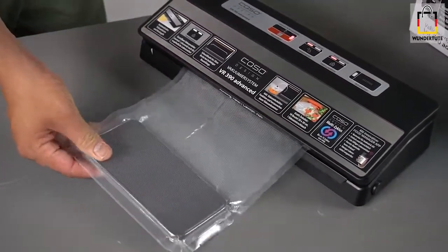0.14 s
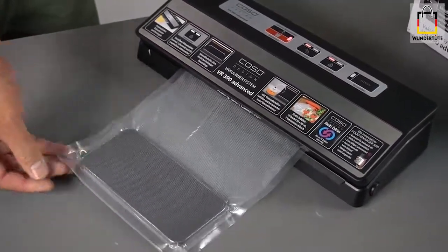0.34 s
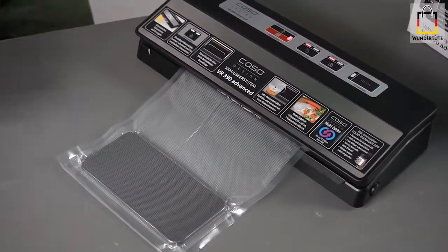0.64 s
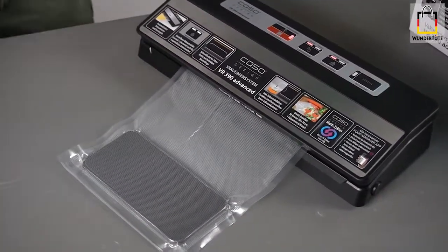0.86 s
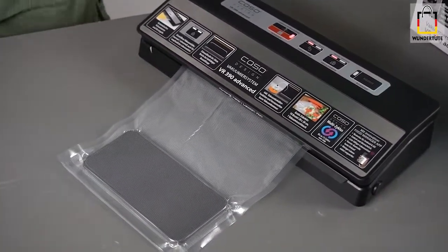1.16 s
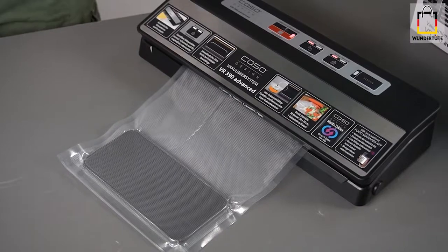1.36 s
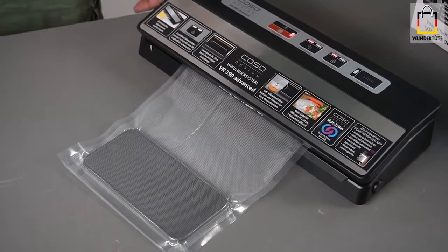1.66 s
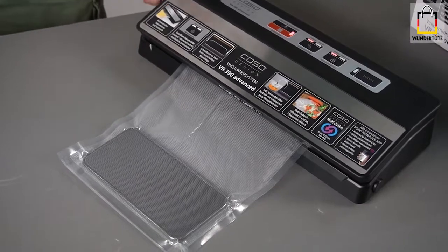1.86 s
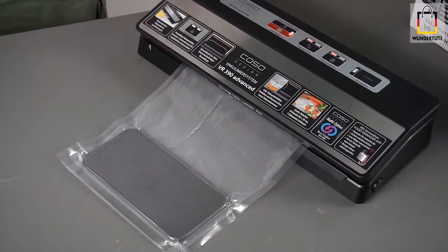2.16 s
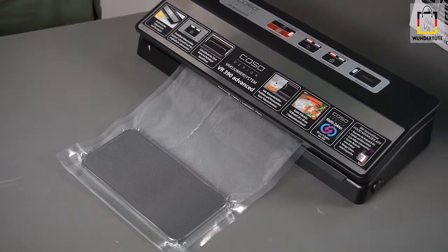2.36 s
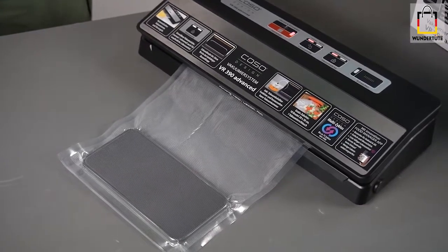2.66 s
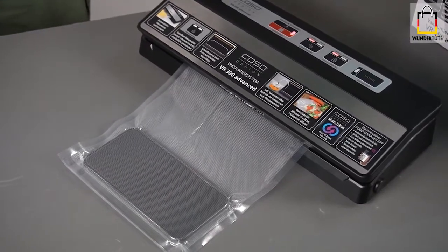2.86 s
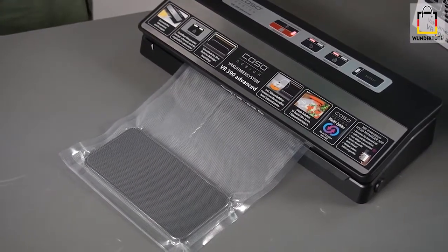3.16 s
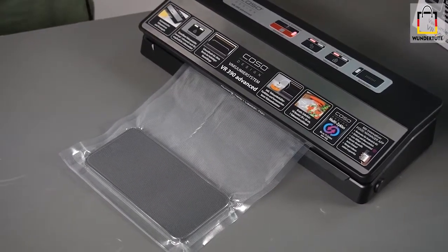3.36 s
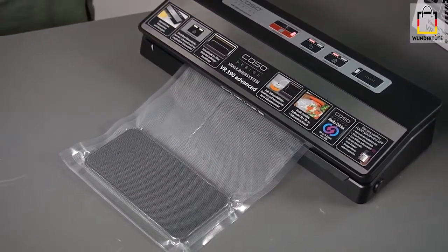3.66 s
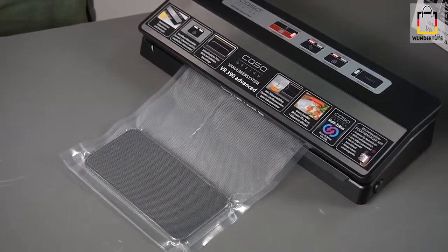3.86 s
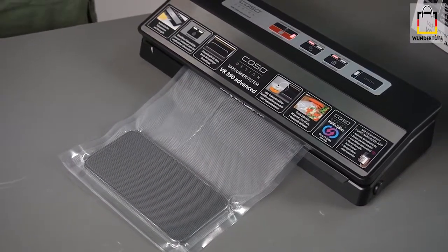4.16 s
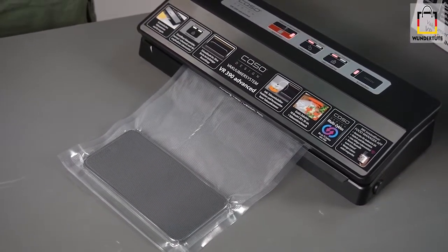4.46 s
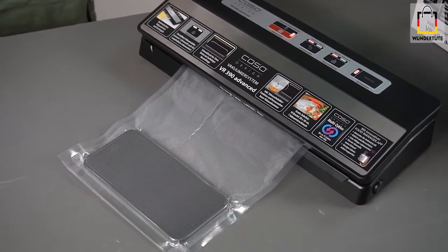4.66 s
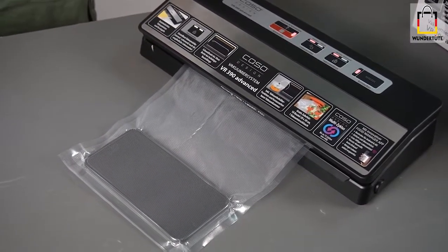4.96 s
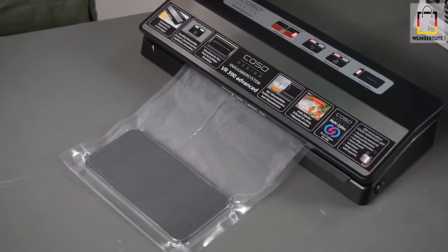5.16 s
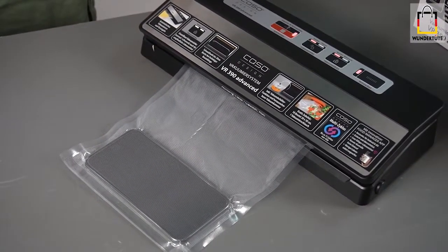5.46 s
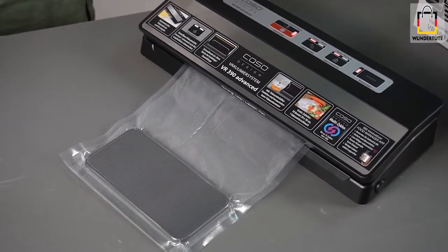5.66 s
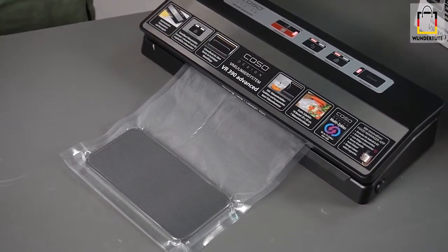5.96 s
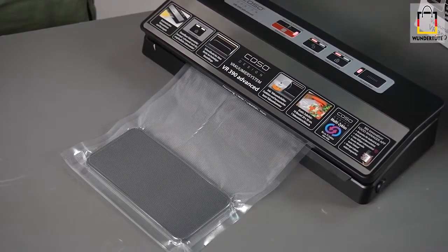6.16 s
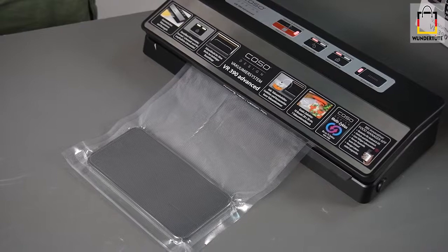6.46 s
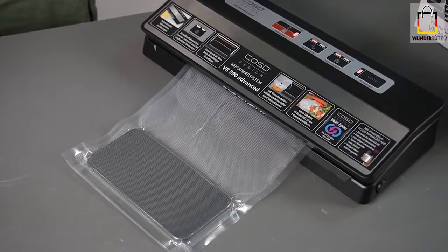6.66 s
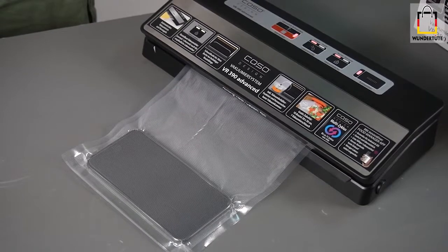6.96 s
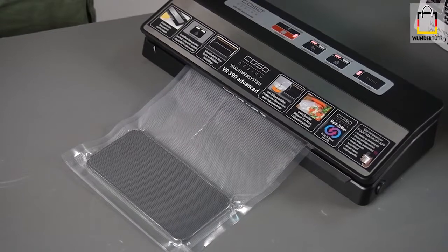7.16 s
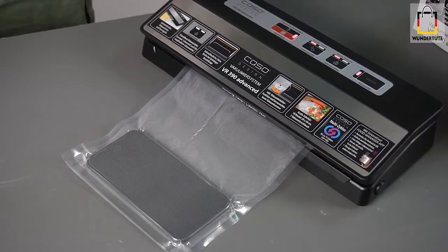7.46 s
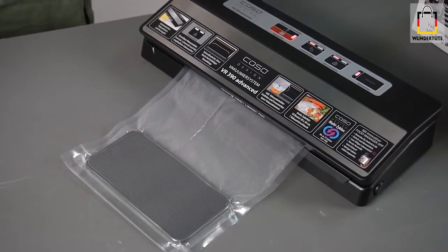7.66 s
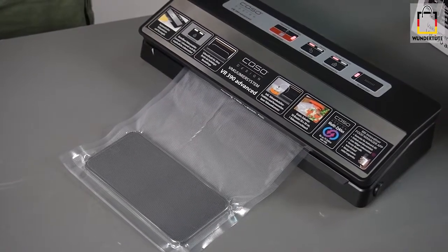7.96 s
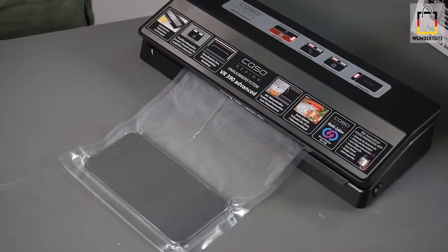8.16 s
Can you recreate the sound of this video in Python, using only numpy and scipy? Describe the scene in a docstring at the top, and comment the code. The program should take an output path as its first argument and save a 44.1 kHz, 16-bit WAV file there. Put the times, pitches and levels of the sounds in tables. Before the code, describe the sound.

A small vacuum sealer is already running on a table, heard close up. Its pump knocks so rapidly in the plastic housing that it forms a buzzing drone, with a fine valve rattle, a whirr of air and a faint electrical hum. From about 0.2 to 0.6 seconds, a flat object in a plastic bag settles on the table with a cluster of soft thuds. The film crinkles in short, light bursts up to about 1.4 seconds, and once more faintly near 2.7 seconds. Over the first two seconds the motor rises slightly in pitch, whining overtones swell and fade, and the airy hiss eases as the bag empties. The drone then holds steady. At about 4.4 seconds sealing begins: the motor drops a little in pitch and changes tone, then runs on evenly until the end at about 8.3 seconds.

```python
"""A small vacuum sealer on a table draws the air from a plastic bag. From the start, each stroke of its
piston pump knocks the plastic housing and rattles the valves, over a whirr of air and a faint hum.
In the first second a hand lets the bag and its flat load settle on the table with soft thuds.
As the bag empties, the film crinkles, the motor speeds up and overtones of the shaft swell and fade.
After about 4.4 s the sealing bar draws current, and the motor runs on a little slower."""
import sys
import numpy as np
from scipy import signal
from scipy.fft import rfft, irfft, next_fast_len
from scipy.io import wavfile
from scipy.ndimage import map_coordinates

SR = 44100
rng = np.random.default_rng(int(sys.argv[2]) if len(sys.argv) > 2 else 0)


def generate_wav(sig):
    """Save sig (samples, or channels by samples) to the path in sys.argv[1] as 16-bit PCM at SR."""
    pcm = np.round(np.clip(np.atleast_2d(sig).T, -1, 1) * 32767).astype(np.int16)
    wavfile.write(sys.argv[1], SR, pcm)


N = 366471

# Air flow (relative to the empty bag) and valve sounds over time: time_s, air_db, ring_db, sizzle_db
VALVE_LEVELS = [(0, 8, -38, -52), (.1, 5.5, -37, -43), (.38, 6, -35, -36.5), (.62, 3.5, -35.5, -40),
                (.8, 1, -37.5, -48), (1.02, 0.5, -41.5, -50.5), (1.6, -0.5, -51, -46), (1.75, 2, -45, -44),
                (2.3, -0.5, -43, -46), (8.31, 0, -43.5, -44.5)]


def amp(db):
    """Decibels as an amplitude ratio."""
    return 10 ** (np.asarray(db) / 20)


def unit(x):
    """Normalisation to an rms of one."""
    return x / np.sqrt(np.mean(x ** 2) + 1e-20)


def along(points, hz):
    """Interpolation of (frequency_hz, value) points on a logarithmic axis."""
    point_hz, values = np.transpose(points)
    return np.interp(np.log(hz + 1), np.log(point_hz + 1), values)


def curves(rows):
    """Linear interpolation in time: one value a sample for each column after time_s."""
    time_s, *columns = np.transpose(rows)
    return [np.interp(np.arange(N) / SR, time_s, column) for column in columns]


def filtered(x, response):
    """Linear filtering: the spectrum is multiplied by a frequency response."""
    size = next_fast_len(N + 8192)
    return irfft(rfft(x, size) * response(np.fft.rfftfreq(size, 1 / SR)), size)[..., :N]


def modes(table, signs=None):
    """Superposed resonances (pitch_hz, width_hz, gain_db); signs alternate unless given."""
    signs = (-1) ** np.arange(len(table)) if signs is None else signs
    return lambda hz: sum(sign * amp(db) * 1j * hz * width / (pitch ** 2 - hz ** 2 + 1j * hz * width)
                          for sign, (pitch, width, db) in zip(signs, table))


def spread(pair):
    """Partial coherence: two independent signals mix as mid and side into left and right."""
    # Likeness of left and right: frequency_hz, correlation
    coherence = [(60, 1.0), (130, 1.0), (290, 1.0), (640, 0.75), (1410, 0.097), (3100, 0.48), (6820, 0.18),
                 (15000, 0.49)]
    # Stereo balance: frequency_hz, left_minus_right_db
    balance = [(300, 0), (700, -3), (2400, -1.5), (4400, 1), (8100, 7), (15000, .5)]

    def weights(hz):
        angle = np.arccos(np.clip(along(coherence, hz), -1, 1)) / 2
        return np.array([np.cos(angle), np.sin(angle)])

    mid, side = filtered(pair, weights)
    left_right = np.array([mid + side, mid - side])
    return filtered(left_right, lambda hz: amp(np.outer([.5, -.5], along(balance, hz))))


def shaft_turns():
    """Rotation is the integral of speed, which rises as the bag empties and sags under the bar's load."""
    start_hz, free_hz, sealing_hz = 38.843, 40.876, 39.617
    spin_up_s, spin_up_shape, seal_s, sag_s = .971, 1.326, 4.379, .03
    t = np.arange(N) / SR
    speed_hz = free_hz - (free_hz - start_hz) * np.exp(-(t / spin_up_s) ** spin_up_shape)
    load = np.clip((t - seal_s) / sag_s, 0, 1)
    return np.cumsum(speed_hz + load * (sealing_hz - speed_hz)) / SR


def piston_strokes(scatter_db):
    """Periodic excitation: one impulse a turn, and the fraction of a turn since the last one."""
    turns = shaft_turns() - .33  # the first stroke comes a third of a turn in
    at = np.interp(np.arange(np.floor(turns[-1]) + 1), turns, np.arange(N))[:, None]
    taps = np.floor(at) + np.arange(-7, 9)
    strength = amp(scatter_db * rng.standard_normal(at.shape))
    # A windowed sinc places each impulse between samples.
    pulses = strength * np.sinc(taps - at) * np.cos(np.pi * (taps - at) / 16) ** 2
    return np.bincount(taps.astype(int).ravel(), pulses.ravel(), N + 16)[:N], turns % 1


def housing_knock(strokes):
    """Forced vibration: piston blows ring the housing's modes, whose levels shift with the vacuum."""
    # Housing modes: pitch_hz, width_hz, polarity, left_minus_right_db, then a level for each stage:
    # loose_db, drawing_db, tightening_db, empty_db, sealing_db
    housing = np.array([(98, 49, -1, 0, -43, -45, -41, -44, -41),
                        (200.1, 12, -1, 0, -35.5, -37.5, -34.5, -34, -41.5),
                        (297.2, 54, -1, 0, -35, -35.5, -37, -34, -34.5),
                        (344.4, 9.7, -1, 0, -30, -29, -28.5, -52, -33.5),
                        (452.5, 61, -1, 7.5, -33, -33, -35.5, -32, -35.5),
                        (530.6, 24.1, -1, -4.5, -25.5, -25.5, -29.5, -29, -24),
                        (593.7, 58.3, 1, -6.5, -35, -32, -55, -35.5, -31.5),
                        (697, 11.3, 1, 5, -66, -72, -44, -79, -35),
                        (736.3, 41.7, -1, -2, -40, -45.5, -43.5, -46, -37.5),
                        (902, 29, -1, 4, -57, -44, -40.5, -45, -75),
                        (1034, 27, -1, 2, -63, -44.5, -42, -48, -46),
                        (1200.5, 68, -1, 0.5, -57, -42.5, -33, -29.5, -32),
                        (1228, 19, 1, -5, -59, -58, -44, -32, -48),
                        (1366.4, 32, 1, -3.5, -63, -50, -26, -26, -27.5),
                        (1355.9, 28, -1, 2, -39, -66, -26, -28, -34.5),
                        (1547.3, 37.1, 1, -3, -31.5, -30.5, -36, -31, -27),
                        (1599, 34, 1, -6.5, -36, -50, -37, -35.5, -42),
                        (1710, 30, -1, -7, -45, -39, -47, -63, -59),
                        (1766, 98, 1, -8, -72, -67, -43, -58, -62),
                        (2020, 25, 1, 6.5, -70, -71, -65, -50, -49.5),
                        (2209, 75, 1, -4, -36, -44.5, -41.5, -38.5, -46.5),
                        (2235.3, 35, -1, -11.5, -38, -72, -51, -39.5, -46),
                        (2436, 48, -1, -9.5, -44, -48, -43.5, -50, -48.5),
                        (2580, 7.6, -1, 12.5, -43, -45, -38, -41, -41),
                        (2980, 61, 1, 1, -51, -59, -54, -49, -51),
                        (3088, 45, -1, -10.5, -52, -50, -48, -46.5, -47)])
    # Progress from loose bag (0) to sealing (4): time_s, stage
    stages = [(.1, 0), (.85, 1), (1.55, 2), (2.4, 3), (4.36, 3), (4.39, 4)]
    # The knock, two rebounds and the return within a stroke: delay_ms, level_db
    impacts = [(1.3, 0.5), (4.3, -13), (8.8, -14.5), (20.5, -14)]
    # Bands in which the blow travels slowly through the case: centre_hz, width_hz
    slow_bands = [(290, 100), (1600, 74), (2500, 490)]
    hz = np.fft.rfftfreq(8192, 1 / SR)
    u = 1j * hz / 3500
    blow = 1 / (1 + 1j * hz / 5000) ** 2 / (1 + u + u * u) ** 2  # the rubber piston lip blunts the blow
    blow *= 1j * hz / (45 + 1j * hz)  # the small housing radiates little deep bass
    for centre, width in slow_bands:
        resonance = centre ** 2 - hz ** 2 + 1j * hz * width
        blow *= resonance.conj() / resonance  # all-pass dispersion
    blow *= sum(amp(db) * np.exp(-2j * np.pi * hz * ms / 1000) for ms, db in impacts)
    blow = blow * np.exp(-2j * np.pi * np.outer([1, 0], hz) / SR)  # the pump is a touch to the right
    polarity = np.sign(housing[:, 2])
    balance_db = housing[:, 3] * (housing[:, 0] > 480)  # bass modes are equally loud on both sides
    stage = curves(stages)[0]
    sound = np.zeros((2, N))
    for k, level_db in enumerate(housing[:, 4:].T):
        sides = [modes(np.c_[housing[:, :2], level_db + side * balance_db / 2], polarity)(hz)
                 for side in (1, -1)]
        crossfade = np.clip(1 - abs(stage - k), 0, 1)
        sound += signal.oaconvolve((strokes * crossfade)[None], irfft(sides * blow), axes=1)[:, :N]
    return sound * SR / 40 / np.sqrt(2)  # gives the bare impulses unit rms per overtone at 40 Hz


def valve_rattle(strokes, phase):
    """Noise-excited resonance: a burst each stroke, part repeating and part new, rings small hard parts."""
    # Resonances of the metal ring, rattle, fizz and sizzle: pitch_hz, width_hz, gain_db
    ring_modes = [(4446, 68, 2), (4574, 400, -5), (3628, 42, -3), (4116, 89, -6)]
    rattle_modes = [(5200, 410, -5), (6160, 260, -4), (6560, 130, 0), (7140, 170, -0.5), (9680, 630, -3)]
    fizz_modes = [(11700, 3700, 1), (15030, 900, 4.5)]
    sizzle_modes = [(7966, 870, 2), (8423, 560, 2), (8890, 270, 0)]
    air_db, ring_db, sizzle_db = curves(VALVE_LEVELS)
    rattle_db, fizz_db = -45 + air_db, -54 + 0.52 * air_db
    t = np.arange(SR // 20) / SR
    burst = (1 - np.exp(-t / 0.00096)) * amp(-60 * t / 0.04) * rng.standard_normal((2, len(t)))
    # The valves open, and the air starts to rush, just ahead of the knock.
    repeating = signal.oaconvolve(strokes[None], burst, axes=1)[:, 80:80 + N]
    rush_phase = (phase + 0.12) % 1
    puff = (1 - np.exp(-rush_phase / 0.11)) * np.exp(-rush_phase / 0.02) + 0.58
    clatter = unit(unit(repeating) + 0.24 * unit(puff * rng.standard_normal((2, N))))
    airy = clatter + 0.13 * rng.standard_normal((2, N))  # the steady stream also blows the metal part
    fizz_decay = np.exp(-rush_phase / 0.38) + .2  # the highest tones die first
    brief = (clatter + rng.standard_normal((2, N))) * fizz_decay
    layers = ((airy, ring_modes, ring_db), (clatter, rattle_modes, rattle_db),
              (brief, fizz_modes, fizz_db), (clatter, sizzle_modes, sizzle_db))
    sound = np.zeros((2, N))
    for drive, resonances, level_db in layers:
        ringing = unit(filtered(drive, lambda hz: modes(resonances)(hz) ** 2))
        sound += amp(level_db + flutter_db()) * ringing
    return spread(sound)


def flutter_db():
    """Amplitude modulation: the loose bag makes the air unsteady; the treble dips as the load lands."""
    depth_db, knots_per_s, settle_s = 1.7, 10.1, 1.3
    dip_s, dip_db, recovery_s = .44, 9, 0.06
    t = np.arange(N) / SR
    wander = map_coordinates(rng.standard_normal(200), [t * knots_per_s])
    dip = (t > dip_s) * np.exp(-np.abs(t - dip_s) / recovery_s)
    return depth_db * np.exp(-t / settle_s) * wander - dip_db * dip


def shaft_whine():
    """Harmonics of rotation: sines locked to the shaft swell and fade as the motor gains speed."""
    # Shaft overtones: harmonic, loudest_s, half_length_s, level_db
    overtones = [(20, 0.32, 0.35, -32.5), (40, 0.25, 0.46, -32), (41, 0.79, 0.11, -31.5),
                 (29, 1.38, 0.62, -26.5), (55, 1.01, 0.25, -37), (58, 0.16, 0.18, -40),
                 (30, 0.36, 0.27, -31)]
    t, turns = np.arange(N) / SR, shaft_turns()
    tones = np.zeros(N)
    for harmonic, loudest_s, half_length_s, level_db in overtones:
        swell = np.exp(-((t - loudest_s) / half_length_s) ** 2)
        tones += amp(level_db) * swell * np.sin(2 * np.pi * harmonic * turns)
    return np.sqrt(2) * tones * amp([[-1], [1]])  # 2 dB louder on the right


def load_thuds():
    """Damped impact: each soft contact booms at its own pitch, shakes the table and slaps the plastic."""
    # The load touches the table: start_s, level_db, pitch_hz, slap_relative_db
    contacts = [(0.173, -11, 210, -13), (0.199, -23, 316, -20), (0.213, -15, 327, -20),
                (0.238, -24, 384, -12), (0.363, -10, 427, -20), (0.389, -9, 315, -14),
                (0.415, -11, 296, -13), (0.436, -9, 320, -9), (0.458, -12, 316, -12),
                (0.486, -9.5, 243, -13), (0.537, -17, 270, -13), (0.569, -14, 278, -10)]
    # Modes of the table top: pitch_hz, width_hz, gain_db
    table_modes = [(109, 40, -3), (150, 26, 4), (226, 22, 2), (303, 25, 6), (430, 86, 1)]
    boom, push, slap = np.zeros((3, N))
    t = np.arange(SR // 10) / SR
    attack = 1 - np.exp(-t / 0.0055)
    for start_s, level_db, pitch_hz, slap_db in contacts:
        push_noise, slap_noise = rng.standard_normal((2, len(t)))
        start = round(start_s * SR)
        span = slice(start, start + len(t))
        boom[span] += amp(level_db - 60 * t / 0.056) * attack * np.sin(2 * np.pi * pitch_hz * t)
        push[span] += amp(level_db + 14 - 60 * t / 0.032) * push_noise
        slap[span] += amp(level_db + slap_db - 60 * t / 0.097) * slap_noise
    plastic = modes([(1100, 1500, 6)])
    return boom + filtered(push, modes(table_modes)) + filtered(slap, lambda hz: plastic(hz) ** 2)


def bag_crinkle():
    """Buckling: the film creases in short clusters of tiny snaps."""
    # Clusters of creasing: loudest_s, half_length_s, level_db
    clusters = [(0.123, .05, -45), (0.356, 0.057, -43), (.66, 0.076, -45), (1.314, 0.076, -43),
                (2.7, .06, -52)]
    t = np.arange(N) / SR
    noise = rng.standard_normal((2, N))
    spikes = (rng.random(N) < .02) * rng.exponential(2.1, N)
    film = unit(filtered(noise * (0.44 + spikes), modes([(7000, 4700, 0)])))
    envelope = sum(amp(db) * np.exp(-((t - loudest_s) / half_s) ** 2) for loudest_s, half_s, db in clusters)
    return spread(film * envelope)


def motor_whirr(level_db):
    """Broadband noise of brushes, bearings and moving air; the treble follows the air that still flows."""
    # Spectrum of the motor and air noise: frequency_hz, relative_density_db
    spectrum = [(15, -30), (28, -8), (48, 1.5), (65, -7), (100, 0), (160, -5), (260, -0.5), (600, -7),
                (950, -6.5), (1400, 0), (1900, -6.5), (3000, -13), (3500, -15.5), (5000, -21), (9000, -26),
                (11000, -30.5), (16000, -54)]
    hiss_db = curves(VALVE_LEVELS)[0] + flutter_db()
    noise = unit(filtered(rng.standard_normal((2, N)), lambda hz: amp(along(spectrum, hz))))
    treble = filtered(noise, lambda hz: 1 / (1 + (2800 / (hz + 1)) ** 4))
    return amp(level_db) * spread(noise + (amp(hiss_db) - 1) * treble)


def mains_hum():
    """Alternating current makes the power supply hum faintly in three steady tones."""
    # Tones of the power supply: pitch_hz, rms_db
    tones = [(50, -59), (100, -53), (148, -52)]
    t = np.arange(N) / SR
    return sum(np.sqrt(2) * amp(db) * np.sin(2 * np.pi * hz * t) for hz, db in tones)


def scene():
    """Superposition: the pressures of pump, motor, load and bag add."""
    strokes, phase = piston_strokes(scatter_db=.12)
    pump = housing_knock(strokes) + valve_rattle(strokes, phase)
    motor = shaft_whine() + motor_whirr(level_db=-33) + mains_hum()
    return pump + motor + load_thuds() + bag_crinkle()


def record(dry):
    """Band limiting: an ideal low-pass filter removes the highest treble."""
    return filtered(dry, lambda hz: hz < 15850)


dry = scene()
out = record(dry)
generate_wav(out)
```